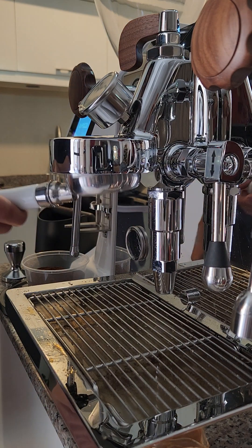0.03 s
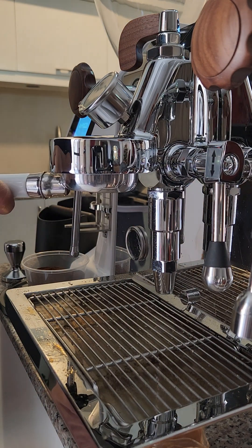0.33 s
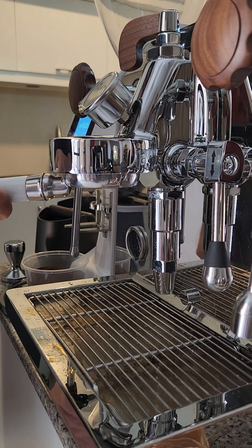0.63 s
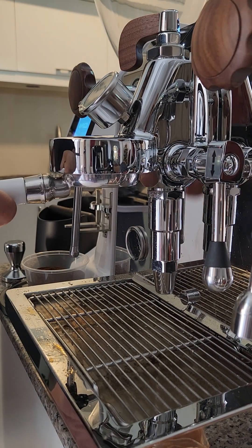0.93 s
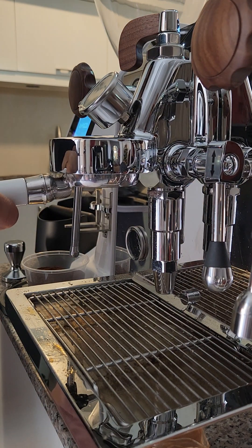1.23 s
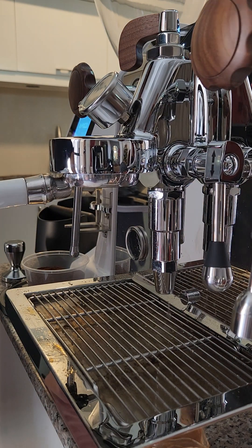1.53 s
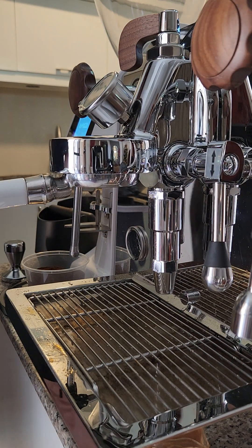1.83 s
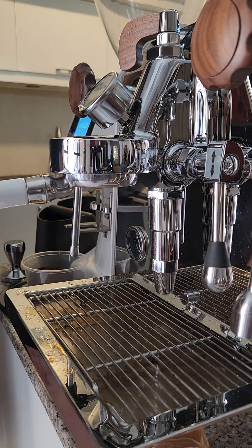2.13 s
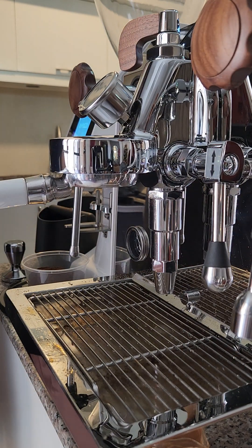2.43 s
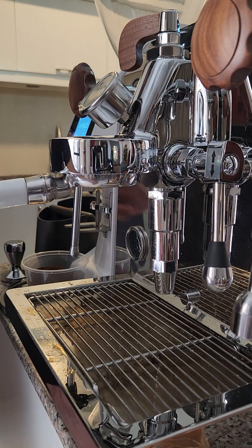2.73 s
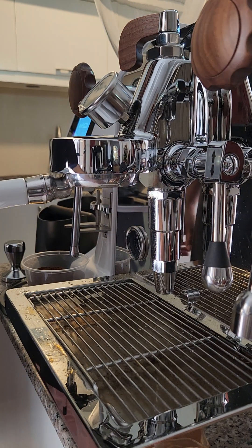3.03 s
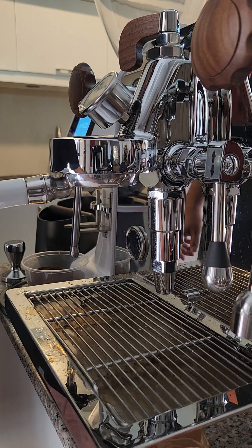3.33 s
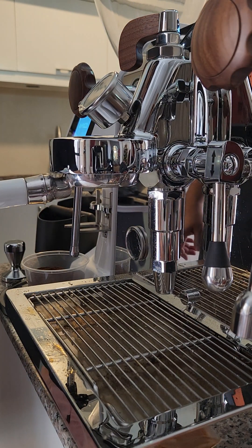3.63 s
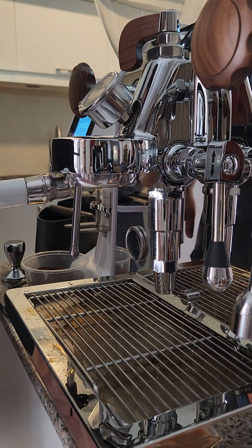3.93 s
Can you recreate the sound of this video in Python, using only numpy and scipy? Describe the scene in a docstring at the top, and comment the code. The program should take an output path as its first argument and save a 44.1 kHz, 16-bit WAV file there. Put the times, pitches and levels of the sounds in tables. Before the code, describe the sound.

A steel portafilter clacks into an espresso machine, close by: a quick run of bright, briefly ringing metal clinks with three dull thuds fills the first half second. Two smaller clicks follow at about 0.8 and 0.9 seconds as it locks, with slight kitchen reverberation. A faint, low, throbbing machine hum and steady hiss lie underneath and continue alone until the end at 4 seconds.

```python
"""A steel portafilter clacks against the group head of an espresso machine, slides home and locks
with two small clicks. Each impact excites dense, short-lived modes of the steel and a clink near
2 kHz from the basket; the group head rings on and the kitchen reverberates. Pushing the handle
draws dull thuds from the frame. Underneath are a steady hiss and a low, throbbing machine hum."""
import sys
import numpy as np
from scipy import signal
from scipy.fft import rfft, irfft
from scipy.io import wavfile

SR = 44100
rng = np.random.default_rng(int(sys.argv[2]) if len(sys.argv) > 2 else 0)


def pcm_store(signal):
    """Save signal as 16-bit PCM."""
    levels = np.round(np.clip(np.atleast_2d(signal), -1, 1) * 32767)
    wavfile.write(sys.argv[1], SR, levels.astype(np.int16).T)


N = 176400
T = np.arange(N) / SR
RING_T = T[:SR]  # the second that follows an impact

# Steel contacts. Each row: start in seconds, clatter, knock and tick levels in dB, clink pitch in Hz,
# clink level in dB, left over right in dB.
CONTACTS = [(-.014, -22, -31.5, -33.5, 2100, -48, 3), (0.0154, -32, -42.5, -60, 2053, -25, 5),
            (0.0804, -30, -32.5, -50, 2077, -26.5, 4), (0.0877, -26, -32.5, -54, 2100, -27.5, 4.5),
            (0.136, -32.5, -45, -44, 2185, -45, 1), (0.1966, -21.5, -30.5, -33, 1875, -24, 1),
            (0.203, -23.5, -32.5, -42, 1896, -20.5, -1), (0.2117, -21, -22.5, -41, 1890, -36, 7),
            (0.34, -22, -29, -41, 1970, -22.5, 3), (0.3496, -34, -36.5, -59, 1904, -21.5, 0),
            (0.36, -49, -35, -60, 1750, -32.5, -3), (0.392, -26.5, -27.5, -60, 2254, -31, 7.5),
            (0.404, -34, -38, -60, 1825, -30, 1), (0.4178, -29, -28.5, -54, 1850, -53, 3),
            (0.762, -49, -41, -66, 2070, -49, 2)]
# The lugs slip as the handle is tightened. Each row: start in seconds, ping pitch in Hz, ping level,
# overtone gain, clatter level and knock level in dB, body pitch in Hz, body level in dB.
LOCK_CLICKS = [(0.7941, 2244, -27.5, 1, -33.5, -36, 1008, -39.5),
               (0.9173, 2295, -27, -40, -38, -34, 621, -39)]
# Pushes on the handle. Each row: start in seconds, frequency in Hz, level in dB.
THUDS = [(.127, 104, -24), (.249, 131, -20), (.457, 130, -21)]

# Spectra of the three parts of an impact. Each row: frequency in Hz, relative density in dB.
CLATTER_SPECTRUM = [(600, -57), (1500, -7), (2200, 1.5), (2700, -8.5), (3150, 3.5), (3700, -2.5), (4500, 5),
                    (5000, -1.5), (5700, 0.5), (6600, -5), (8000, -12), (9000, -25), (16000, -33)]
KNOCK_SPECTRUM = [(60, -13), (170, -1), (290, -12.5), (420, -5), (600, -8), (800, -4), (1050, -5),
                  (1500, -6.5), (2500, -7), (8000, -50)]
TICK_SPECTRUM = [(3000, -40), (7000, 3), (9200, -14), (11500, -2), (14000, -4), (16000, -9.5)]
# Modes of the group head and of a knock. Each row: frequency in Hz, relative level in dB,
# T60 (the time to decay by 60 dB) in seconds.
GROUP_MODES = [(178, -2.5, .5), (580, -15, .9), (994, -9, .5), (1062, -14, .38), (1296, -17, .3),
               (1890, -12, .24), (2277, -19, .24), (3045, -22, .24), (3305, -16, .16), (3791, -7, .32),
               (4343, -15, .2), (4547, -14, .2), (4732, -16, .26), (5484, -8, .17), (6017, -11, .17)]
KNOCK_MODES = [(826, -9.5, 0.054), (1028, -9, .11), (1223, -12.5, 0.089)]
# Modes of the clamped portafilter. Each row: multiple of the pitch, relative level in dB, T60 in seconds.
CLAMPED_MODES = [(1, 3, 0.04), (1.44, 2, 0.034), (2.04, -3, 0.045), (2.12, -6, .045), (2.76, -8, 0.025),
                 (2.95, -8, .028)]
STEEL_ATTACK_S, KNOCK_ATTACK_S, CLINK_ATTACK_S = 0.00057, 0.0018, 0.003

# Decay of the kitchen. Each row: frequency in Hz, T60 in seconds.
ROOM_T60 = [(150, 0.2), (600, 0.8), (2000, 0.67), (5000, 0.31), (12000, 0.4)]
# Strength of its reverberation. Each row: frequency in Hz, gain in dB.
ROOM_GAIN = [(150, 4), (700, -3), (2000, -5.5), (5000, -5.5), (12000, -3)]

# Harmonics of a slow shaft. Each row: multiple of the rotation rate, base level in dB.
HUM_HARMONICS = [(4, -46.5), (5, -36), (6, -37), (7, -36.5), (8, -52), (9, -52), (11, -57), (12, -56.5),
                 (13, -56.5), (15, -58)]
# Slow swells of the hum and of the lower hiss. Each row: time in seconds, gain in dB.
HUM_SWELL = [(0, -5), (.55, -5), (.78, -17), (.88, -0.5), (1.2, -2.5), (1.45, 2.5), (1.65, 0), (2.1, 1.5),
             (2.25, -3.5), (2.5, -5), (2.66, 0.5), (3.2, 1), (3.4, -3), (4, -7)]
LOW_HISS_SWELL = [(0, 1), (1.1, 1.8), (1.7, 2.4), (2.6, 1), (4, -1.6)]
# Spectra of the background noises. Each row: frequency in Hz, relative density in dB.
HISS_SPECTRUM = [(280, 0.5), (600, -1), (850, -7), (1300, -2), (1420, -6.5), (2050, -7.5), (2350, -4.5),
                 (2700, -7.5), (4200, -9.5), (4650, -3), (5100, -10.5), (6500, -13), (7600, -13),
                 (8400, -18.5), (9000, -28), (10000, -27.5), (11700, -24.5), (13000, -28.5), (16000, -31)]
RUMBLE_SPECTRUM = [(15, -49), (27, -33), (35, -3), (43, 1), (53, -1.5), (63, -1.5), (95, -4.5), (107, 3),
                   (118, 1), (137, -1.5), (170, -11), (250, -16), (320, -34.5), (700, -29), (3000, -82)]
SIZZLE_SPECTRUM = [(8000, -30), (11500, 3), (16000, -5)]
# Faint tones in the hiss. Each row: centre frequency in Hz, level in dB.
WHINE_TONES = [(1010, -72), (1351, -65), (4517, -68.5), (4759, -67)]
# Faint high sizzles. Each row: start in seconds, length in seconds, peak level in dB.
SIZZLES = [(1.655, .075, -61), (2.06, .04, -66), (3.045, .025, -61)]

# Likeness of the two channels. Each row: frequency in Hz, coherence from 0 to 1.
STEEL_COHERENCE = [(300, 1), (900, 0.92), (1350, 0.2), (2200, 0.68), (5000, 0.43), (6000, 0.21),
                   (12000, .5)]
BACKGROUND_COHERENCE = [(60, 0.96), (120, 1), (200, 0.87), (380, 0.83), (700, 0.53), (1300, 0.017)]
# Balance of the background and thuds. Each row: frequency in Hz, left over right in dB.
LEFT_BALANCE = [(50, 0.31), (150, 2.46), (500, 3.2), (1200, 4.2), (8000, 1.9)]
LEFT_LEAD_S = 0.000098  # sound from the steel reaches the nearer, left microphone first


def portafilter():
    """Impact excitation: contacts and slipping lugs set the steel ringing, and the kitchen answers."""
    hits, pings, ring = np.zeros((3, 2, N + SR))  # one second of lead-in
    for start, clatter_db, knock_db, tick_db, clink_hz, clink_db, left_db in CONTACTS:
        add(hits, start + 1, panned(blow(clatter_db, knock_db) + edge_tick(tick_db), left_db))
        add(pings, start + 1, panned(basket_clink(clink_hz, clink_db), left_db))
        modes = group_ring(clatter_db, knock_db) + knock_ring(knock_db) + basket_ring(start, clink_db)
        add(ring, start + 1, panned(modes, left_db))
    for start, pitch_hz, ping_db, overtones_db, clatter_db, knock_db, body_hz, body_db in LOCK_CLICKS:
        add(hits, start + 1, panned(blow(clatter_db, knock_db), left_db=6))
        click = lock_ping(pitch_hz, ping_db, overtones_db) + body_knock(body_hz, body_db)
        add(pings, start + 1, panned(click, left_db=6))
        add(ring, start + 1, panned(group_ring(clatter_db, knock_db), left_db=6))
    reverberation = kitchen(hits + amp(-9) * pings)
    return (hits + pings + ring + reverberation)[:, SR:]


def blow(clatter_db, knock_db):
    """Modal overlap: steel on steel excites modes so dense that they merge into clatter and knock."""
    clatter = amp(clatter_db) * steel_noise(CLATTER_SPECTRUM) * strike(STEEL_ATTACK_S, t60=0.056)
    knock = amp(knock_db) * steel_noise(KNOCK_SPECTRUM) * strike(KNOCK_ATTACK_S, t60=0.085)
    return clatter + knock


def edge_tick(tick_db):
    """A brief contact has a wide bandwidth: a metal edge gives a bright tick."""
    return amp(tick_db) * steel_noise(TICK_SPECTRUM) * strike(STEEL_ATTACK_S, t60=0.042)


def basket_clink(hz, clink_db):
    """Beating: two close modes of the basket interfere as they decay."""
    pair = mode(hz) + amp(-9) * mode(0.94 * hz)
    return amp(clink_db) * pair * strike(CLINK_ATTACK_S, t60=0.061)


def basket_ring(start, clink_db, seated_s=0.23):
    """Contact damping: the loose basket rings thinly until seating in the group head chokes it."""
    time_seated = np.maximum(start + RING_T - seated_s, 0)
    choke = decay(time_seated, t60=0.1)
    return amp(clink_db - 15.5) * mode(hz=2145) * strike(CLINK_ATTACK_S, t60=0.34) * choke


def group_ring(clatter_db, knock_db):
    """Free vibration of the group head: the knock feeds its low modes, the clatter its high ones."""
    drive = [(1000, knock_db), (3000, clatter_db)]
    return amp(-9.5) * sum(amp(db + at_frequency(drive, hz)) * mode(hz) * strike(KNOCK_ATTACK_S, t60)
                           for hz, db, t60 in GROUP_MODES)


def knock_ring(knock_db):
    """Damped resonance: short hollow modes, shifted a little by where the blow lands."""
    shifts = 1 + 0.04 * rng.uniform(-0.95, 1, len(KNOCK_MODES))
    return sum(amp(knock_db + db) * mode(hz * shift) * strike(KNOCK_ATTACK_S, t60)
               for (hz, db, t60), shift in zip(KNOCK_MODES, shifts))


def lock_ping(pitch_hz, ping_db, overtones_db):
    """Damping by the gasket cuts short the inharmonic modes of the clamped portafilter."""
    first, *overtones = [amp(db) * mode(multiple * pitch_hz) * strike(attack_s=0.0039, t60=t60)
                         for multiple, db, t60 in CLAMPED_MODES]
    return amp(ping_db) * (first + amp(overtones_db) * sum(overtones))


def body_knock(hz, body_db):
    """Structural resonance: the machine's body answers a slipping lug with two modes."""
    pair = mode(hz) + amp(-7) * mode(1.8 * hz)
    return amp(body_db) * pair * strike(attack_s=0.0042, t60=0.13)


def frame_thuds():
    """A damped oscillator: the frame takes each push of the handle in one low mode."""
    out = np.zeros((2, N))
    for start, hz, db in THUDS:
        thud = amp(db) * np.sin(2 * np.pi * hz * RING_T) * strike(attack_s=0.006, t60=0.1)
        add(out, start, panned(thud, at_frequency(LEFT_BALANCE, hz)))
    return out


def kitchen(direct, gap_s=0.0011):
    """Reverberation: reflections form a diffuse tail, each band decaying at its own rate."""
    hz, t, bands = signal.stft(rng.standard_normal((2, SR)), SR, nperseg=256)
    t60 = at_frequency(ROOM_T60, hz)[:, None]
    gain = amp(at_frequency(ROOM_GAIN, hz))[:, None]
    unit_energy = np.sqrt(2 * np.log(1000) / t60 / SR)
    bands = bands * gain * decay(t, t60) * unit_energy
    tail = signal.istft(bands, SR, nperseg=256)[1][:, :SR] * (RING_T > gap_s)
    return signal.fftconvolve(direct, tail, axes=1)[:, :direct.shape[1]]


def shaft_hum(shaft_hz=17.25, waver_hz=2.5, waver_depth=0.22):
    """Modulation and beating: harmonics of a slow shaft waver and interfere in a throb."""
    out, coarse_t = np.zeros(N), T[::441]
    for multiple, db in HUM_HARMONICS:
        rates, phases = rng.uniform(-1.017, 1, (2, 8))
        drift = unit_rms(np.exp(2j * np.pi * (waver_hz * np.outer(coarse_t, rates) + phases)).sum(1))
        waver = unit_rms(1 + waver_depth * np.interp(T, coarse_t, drift))
        carrier = np.exp(2j * np.pi * (multiple * shaft_hz * T + rng.random()))
        out += amp(db) * np.sqrt(2) * (waver * carrier).real
    return out * gain_curve(HUM_SWELL)


def hiss(corner_hz=1550):
    """Broadband noise, steady in the treble, slowly swelling and fading below the corner."""
    steady = amp(-47.5) * noise(HISS_SPECTRUM, N)
    low = signal.sosfiltfilt(signal.butter(2, corner_hz, fs=SR, output="sos"), steady)
    return steady + low * (gain_curve(LOW_HISS_SWELL) - 1)


def whine(width_hz=5.1):
    """Narrowband noise is heard as thin, unsteady tones."""
    hz = np.fft.rfftfreq(N, 1 / SR)
    white = rfft(rng.standard_normal((2, N)))
    return sum(amp(db) * unit_rms(irfft(white / (1 + (2 * (hz - centre) / width_hz) ** 2), N))
               for centre, db in WHINE_TONES)


def sizzles():
    """Amplitude modulation: half-sine envelopes shape very high noise into brief, faint swells."""
    envelope = sum(amp(db) * np.sin(np.pi * np.clip((T - start) / length, 0, 1))
                   for start, length, db in SIZZLES)
    return envelope * noise(SIZZLE_SPECTRUM, N)


def background():
    """Incoherent sources add in power: hiss, whine, rumble and hum form a bed, a little to the left."""
    bed = hiss() + whine() + amp(-36.5) * noise(RUMBLE_SPECTRUM, N) + shaft_hum()
    left_db = at_frequency(LEFT_BALANCE, np.fft.rfftfreq(N, 1 / SR))
    return irfft(panned(rfft(bed), left_db), N)


def mode(hz, scatter_rad=0.69):
    """A normal mode is a sinusoid; it reaches the right channel later, its phase scattered."""
    phase, scatter = rng.uniform(-1.01, 1, 2)
    left = 2 * np.pi * hz * RING_T
    right = 2 * np.pi * hz * (RING_T - LEFT_LEAD_S) + scatter_rad * scatter
    return np.sqrt(2) * np.cos(np.pi * phase + np.array([left, right]))


def steel_noise(spectrum):
    """Dense steel modes act as noise; a difference in arrival time places them at the group head."""
    return noise(spectrum, SR, STEEL_COHERENCE, LEFT_LEAD_S)


def noise(spectrum, size, coherence=BACKGROUND_COHERENCE, lead_s=0):
    """Partial coherence: two channels share part of a coloured noise, the left leading by lead_s."""
    hz = np.fft.rfftfreq(size, 1 / SR)
    left, independent = rfft(rng.standard_normal((2, size)))
    shared = np.clip(at_frequency(coherence, hz), -1, 1)
    delay = np.exp(-2j * np.pi * hz * lead_s)
    right = (shared * left + np.sqrt(1 - shared ** 2) * independent) * delay
    return unit_rms(irfft(np.array([left, right]) * amp(at_frequency(spectrum, hz)), size))


def strike(attack_s, t60):
    """The envelope of a struck body: a linear rise and a free decay."""
    return np.minimum(RING_T / attack_s, 1) * decay(RING_T, t60)


def decay(t, t60):
    """Exponential damping by 60 dB every t60 seconds."""
    return np.exp(-np.log(1000) * t / t60)


def panned(x, left_db):
    """A level difference gives direction: the left channel exceeds the right by left_db."""
    return x * np.array([np.atleast_1d(amp(left_db / 2)), np.atleast_1d(amp(-left_db / 2))])


def add(mix, start, sound):
    """Superposes a stereo sound on the mix at a start in seconds."""
    part = mix[:, round(start * SR):][:, :sound.shape[1]]
    part += sound[:, :part.shape[1]]


def at_frequency(points, hz):
    """Interpolates a table on a logarithmic frequency axis."""
    frequencies, values = np.transpose(points)
    return np.interp(np.log(hz + 1), np.log(frequencies), values)


def gain_curve(points):
    """Interpolates decibels over time into an amplitude envelope."""
    return amp(np.interp(T, *np.transpose(points)))


def amp(db):
    """Converts decibels to an amplitude ratio."""
    return 10 ** (np.asarray(db) / 20)


def unit_rms(x):
    """Normalises to a mean power of one."""
    return x / np.sqrt(np.mean(abs(x) ** 2) + 1e-20)


def scene():
    """Superposition of the portafilter, the background, the sizzles and the thuds."""
    return portafilter() + background() + sizzles() + frame_thuds()


def record(dry):
    """Band limiting: a linear-phase low-pass filter removes the highest treble."""
    lowpass = signal.firwin(511, cutoff=15900, window=("kaiser", 9), fs=SR)
    return signal.oaconvolve(dry, lowpass[None], "same")


dry = scene()
out = record(dry)
pcm_store(out)
```